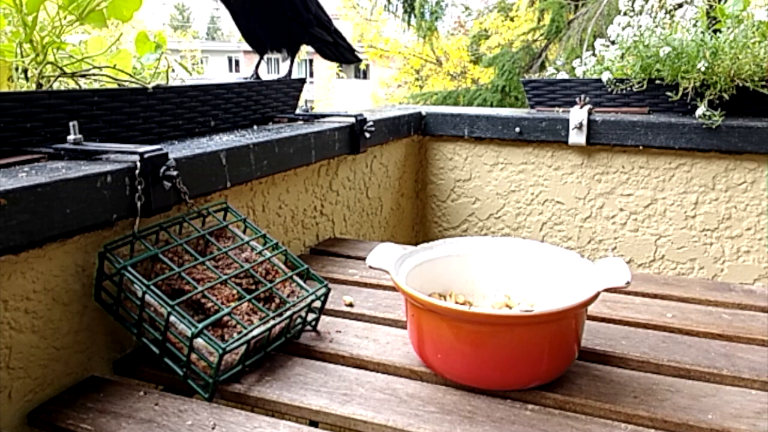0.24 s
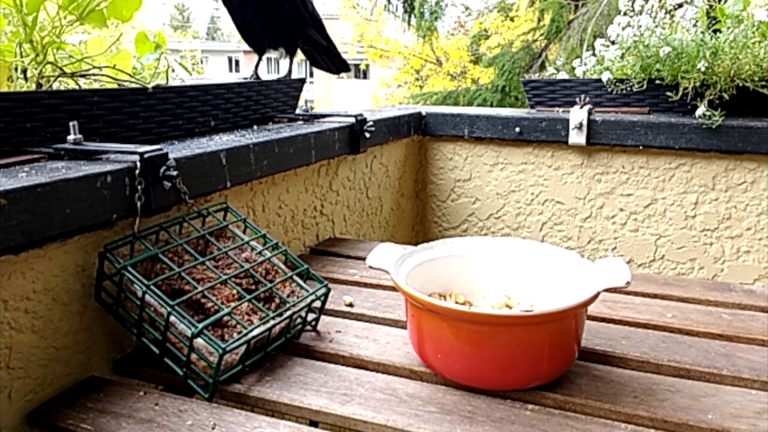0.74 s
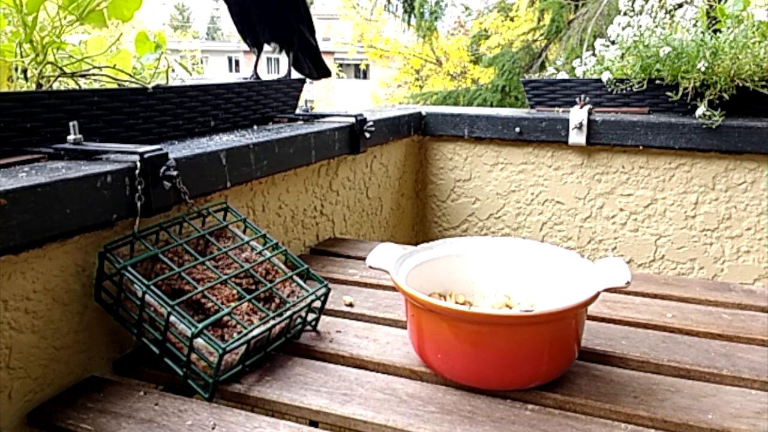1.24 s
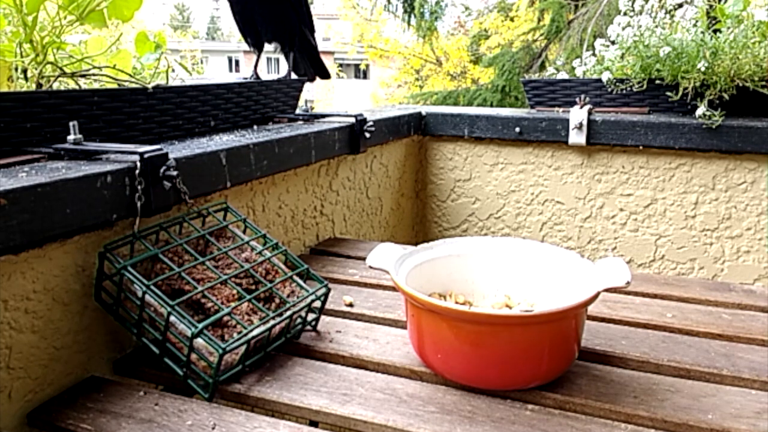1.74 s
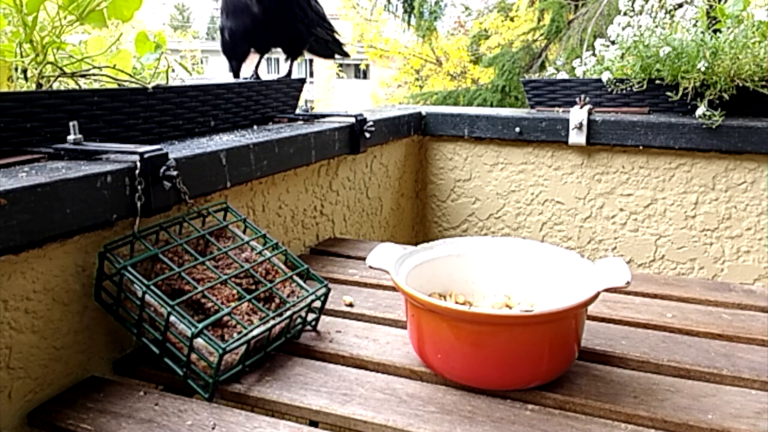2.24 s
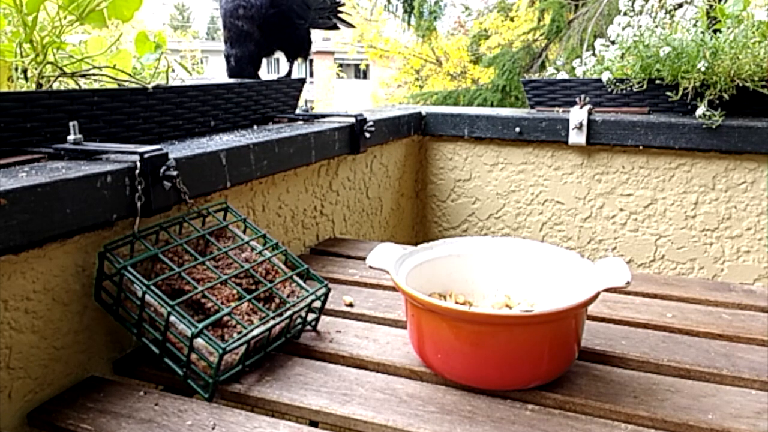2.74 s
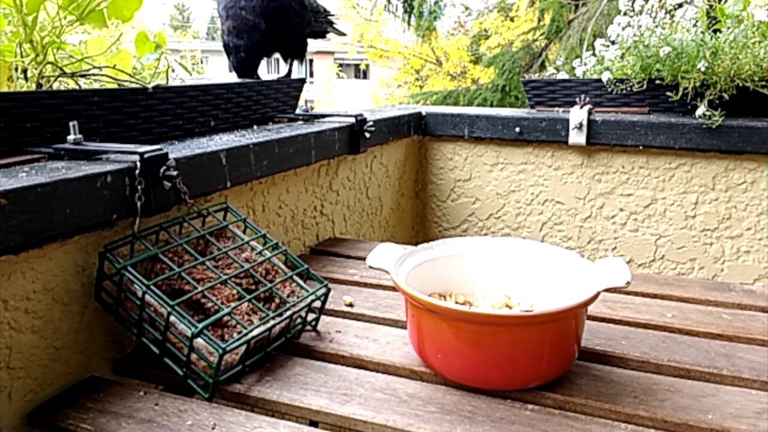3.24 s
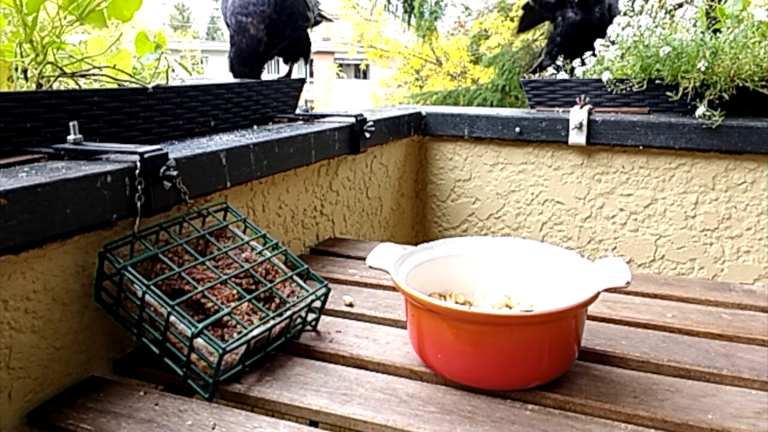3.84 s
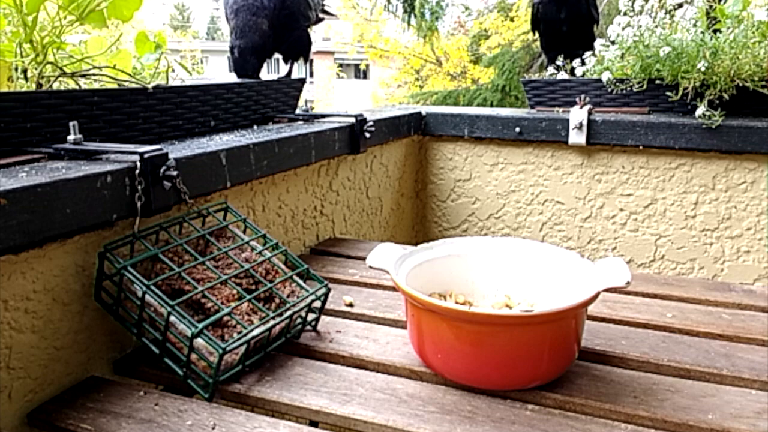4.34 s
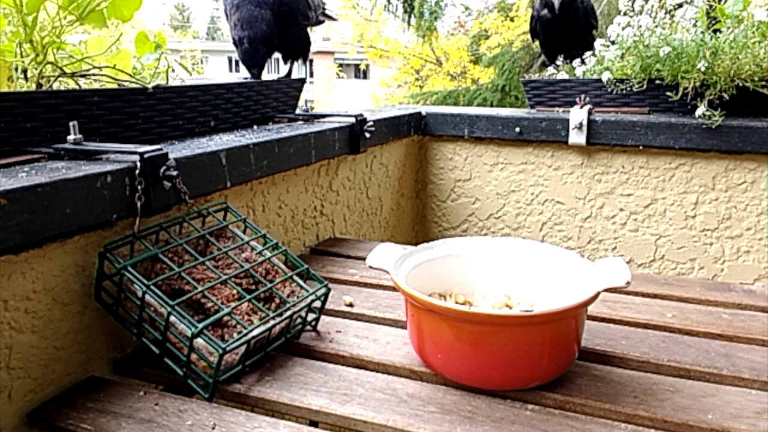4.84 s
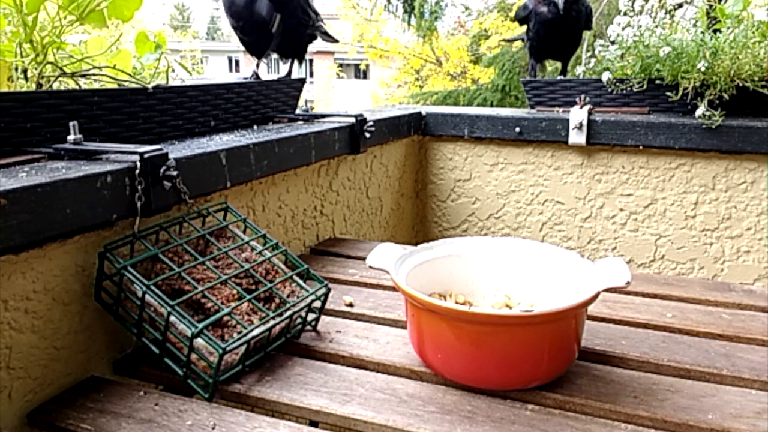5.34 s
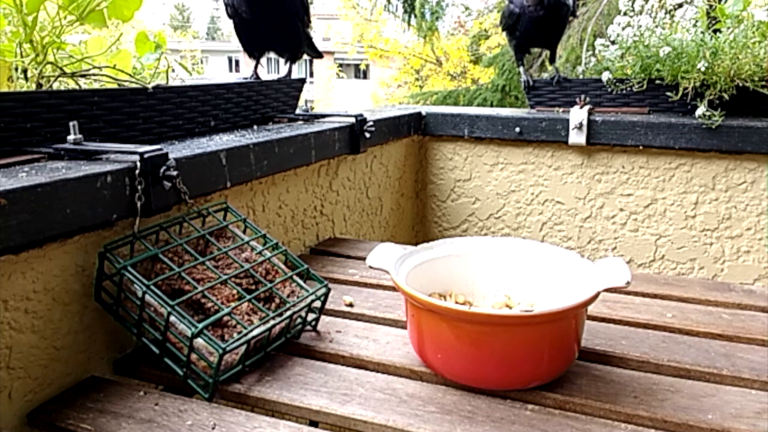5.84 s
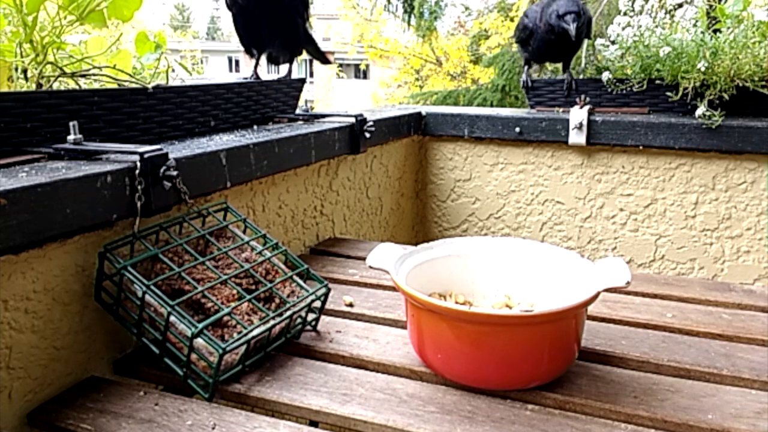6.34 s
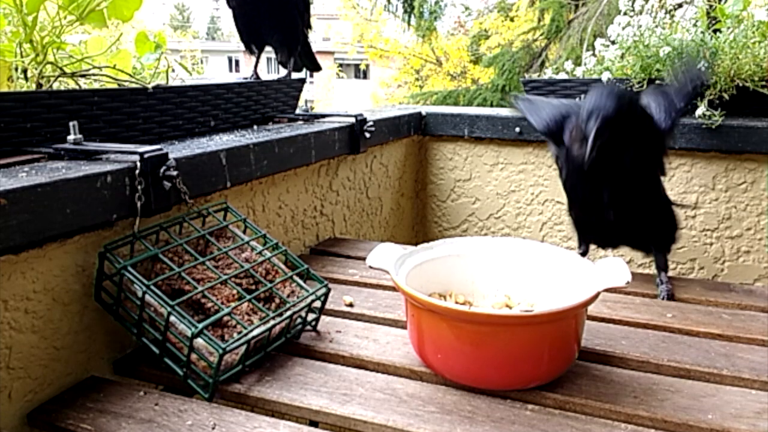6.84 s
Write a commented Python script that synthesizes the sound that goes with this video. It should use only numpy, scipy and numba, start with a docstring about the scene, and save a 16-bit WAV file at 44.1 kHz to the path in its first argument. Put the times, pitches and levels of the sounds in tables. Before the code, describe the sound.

On a small, quiet balcony, crows shift among flower boxes with faint claw ticks and feather rustles, and one lands with a soft, low thud. Three hoarse caws follow, close to the microphone and ringing briefly between the walls. Then a crow thumps onto a wooden table and clinks an enamelled pot. A low distant hum, a faint songbird and fine hiss lie behind.

```python
"""A small stucco balcony in a quiet neighbourhood, one small microphone close to two crows.
Claws tick and feathers rustle among the flower boxes; a box swings and rings under a landing bird.
Three hoarse caws, snapped out by the syrinx and shaped by throat and beak, ring between the walls.
Then a crow drops onto the slatted wooden table and clinks the enamelled pot.
Behind it all: a low, distant hum, a far songbird and a fine hiss."""
import sys
import numpy as np
from scipy import signal
from scipy.fft import rfft, irfft, next_fast_len
from scipy.io import wavfile
from scipy.ndimage import uniform_filter1d, map_coordinates
from numba import njit

SR = 44100
rng = np.random.default_rng(int(sys.argv[2]) if len(sys.argv) > 2 else 0)


def put_to_file(sound):
    """Save the sound as 16-bit audio at rate SR, in the file named by the first command-line argument."""
    columns = np.atleast_2d(sound).T  # one column per channel
    safe = np.clip(columns, -1, 1)
    whole_steps = np.round(safe * 32767)
    wavfile.write(sys.argv[1], SR, whole_steps.astype(np.int16))


N = 313551
TIME = np.arange(N) / SR


def undb(db):
    """Decibels to gain."""
    return 10 ** (np.asarray(db) / 20)


def unit(x):
    """Scale to rms 1."""
    return x / np.sqrt(np.mean(x ** 2) + 1e-20)


def steady(x, size=1500):
    """Hold the running rms at 1, keeping the fast grain."""
    return x / np.sqrt(uniform_filter1d(x ** 2, size) + 1e-12)


def colour(x, points):
    """Filter by a spectrum of (freq_hz, gain_db) points."""
    hz, db = np.transpose(points)
    size = next_fast_len(len(x))
    bins_hz = np.maximum(np.fft.rfftfreq(size, 1 / SR), 1)
    gain = undb(np.interp(np.log(bins_hz), np.log(hz), db))
    return irfft(rfft(x, size) * gain, size)[:len(x)]


@njit
def resonate(x, hz, width_hz):
    """A two-pole state-variable band-pass."""
    y, band_state, low_state = np.empty(len(x)), 0., 0.
    g, damping = np.tan(np.pi * hz / SR), width_hz / hz
    for i in range(len(x)):
        v = (band_state + g * (x[i] - low_state)) / (1 + g * (g + damping))
        band_state = 2 * v - band_state
        low_state += 2 * g * v
        y[i] = damping * v
    return y


def band(x, hz, width_hz):
    """A resonance applied twice, for steep sides."""
    return resonate(resonate(x, hz, width_hz), hz, width_hz)


def walk(rate_hz, size):
    """A smooth random wander with spread near 1."""
    steps = np.arange(size) * rate_hz / SR
    return map_coordinates(rng.standard_normal(int(steps[-1]) + 2), [steps], order=2, mode="nearest")


def fade(t, t60, rise_s):
    """A blow's envelope: quick rise, exponential decay."""
    return (1 - np.exp(-t / rise_s)) * np.exp(-np.log(1000) * t / t60)


def swells(rows):
    """Gain that rises and falls smoothly around each listed moment."""
    return sum(undb(db) * np.exp(-((TIME - peak_s) / half_s) ** 2) for peak_s, half_s, db in rows)


def ring(modes, t, rise_s):
    """Decaying modes of a struck body."""
    return sum(undb(db) * fade(t, t60, rise_s) * np.sin(2 * np.pi * hz * t) for hz, db, t60 in modes)


def add(out, start_s, x):
    """Mix x in at start_s."""
    i = int(start_s * SR)
    out[i:i + len(x)] += x[:max(N - i, 0)]


# The air beyond the balcony, far noise and hiss: freq_hz, gain_db
AIR_SPECTRUM = [(15, -38), (25, -14), (53, -0.5), (82, 0), (133, -7), (184, -8), (241, -7.5), (371, -15),
                (1010, -17.5), (1730, -23), (1870, -27), (3050, -25.5), (3880, -29.5), (9460, -30.5),
                (14600, -26), (15800, -19.5)]
# Low rumble in the background: freq_hz, gain_db
RUMBLE_SPECTRUM = [(25, -30), (45, -8), (72, -0.5), (95, -12), (130, -16), (300, -20.5), (900, -30),
                   (3000, -41.5)]
# Its swells: peak_s, half_length_s, level_db
RUMBLE_SWELLS = [(.12, 0.25, -50.5), (1.44, 0.28, -47)]
# A machine humming in the distance: pitch_hz, level_db
MACHINE_HUM = [(59.3, -56.5), (119, -58.5), (151, -64.5)]


def neighbourhood(air_db=-49.5, waver_db=1):
    """Steady far noise, a swelling rumble and a wavering machine hum."""
    air = unit(colour(rng.standard_normal(N), AIR_SPECTRUM)) * undb(air_db + waver_db * walk(5.5, N))
    rumble = unit(colour(rng.standard_normal(N), RUMBLE_SPECTRUM)) * swells(RUMBLE_SWELLS)
    hum = np.zeros(N)
    for hz, db in MACHINE_HUM:
        amplitude = np.sqrt(2) * undb(db + 2 * walk(3.785, N))
        hum += amplitude * np.sin(2 * np.pi * hz * TIME + 0.78 * walk(5.1, N))
    return air + rumble + hum


def crackle(level_db=-63, grain_db=4, swell_db=0.5):
    """The top of the hiss crackles finely."""
    grains = rng.standard_normal(N) * undb(grain_db * walk(110, N) + swell_db * walk(6.9, N))
    treble = [(1000, -48), (4000, -19), (10500, 14.5), (13000, 24), (15500, 10)]
    return undb(level_db) * unit(colour(grains, treble))


def patter(count=330, faintest_db=-61, range_db=5, t60=0.12, width_share=0.14):
    """Faint pips and ticks throughout, each at its own pitch."""
    out, t = np.zeros(N), TIME[:SR // 6]
    for when, pitch, strength in rng.random((count, 3)):
        hz = 1700 * 4.4 ** pitch
        pip = unit(band(rng.standard_normal(len(t)), hz, width_share * hz)) * fade(t, t60, 0.0031)
        add(out, when * N / SR, pip * undb(faintest_db + range_db * strength))
    return out


# Small ticks, close to the microphone and dry: start_s, level_db, centre_hz, width_hz
CLAW_TICKS = [(0.158, -47, 14300, 3000), (0.744, -48, 4600, 700), (0.928, -50, 10600, 2500),
              (0.965, -48, 5800, 1000), (1.078, -50.5, 6500, 4960), (1.464, -44.5, 7230, 1410),
              (1.759, -52, 8700, 2500), (2.03, -51.5, 7200, 2500), (2.222, -45.5, 13100, 3000),
              (2.344, -53, 8550, 11900), (2.77, -51.5, 2700, 1800), (2.841, -50, 13200, 7000),
              (4.064, -47.5, 9900, 1500), (4.457, -52.5, 2850, 900), (4.546, -52.5, 7350, 1300),
              (4.804, -49, 13600, 3970), (4.87, -43.5, 7000, 12800), (5.217, -40, 13000, 8060),
              (5.321, -44, 12800, 9110), (6.055, -48, 13000, 8950), (6.13, -52.5, 4570, 5970),
              (6.485, -36, 13530, 6000), (6.72, -44, 12410, 7050)]


def ticks(snap_db=-1, snap_t60=0.027, ring_db=-0.5, ring_t60=0.18):
    """Claws, beaks and the odd drip on wicker and leaves: a dry snap and a short ring."""
    out, t = np.zeros(N), TIME[:SR // 4]
    for start_s, db, hz, width_hz in CLAW_TICKS:
        noise = rng.standard_normal(len(t))
        snap = undb(snap_db) * unit(band(noise, 4800, 18000)) * fade(t, snap_t60, 0.00028)
        ringing = undb(ring_db) * unit(band(noise, hz, width_hz)) * fade(t, ring_t60, 0.0008)
        add(out, start_s, undb(db) * (snap + ringing))
    return out


# Feathers against leaves, close by: peak_s, half_length_s, level_db
FEATHER_BRUSHES = [(1.0, 0.19, -51), (1.6, 0.17, -52), (2.36, 0.019, -46), (3.29, 0.3, -50),
                   (3.5, 0.039, -47.5), (3.71, 0.064, -43)]


def rustle():
    """Feathers brush the leaves: a fine, grainy hiss."""
    grains = rng.standard_normal(N) * undb(2.8 * walk(150, N))
    spectrum = [(300, -23), (1500, -3.5), (6000, -6), (10000, -4), (13000, 1), (15500, 6)]
    return unit(colour(grains, spectrum)) * swells(FEATHER_BRUSHES)


# A small bird far off: start_s, length_s, start_hz, end_hz
SONG_NOTES = [(1.08, .07, 2310, 2125), (2.104, 0.049, 2090, 1700), (2.305, 0.065, 1880, 1570),
              (2.446, .09, 1580, 1726), (2.523, 0.052, 2500, 2700), (2.604, 0.087, 3810, 3830),
              (3.742, 0.041, 2340, 2330)]


def songbird(level_db=-60.5, waver=0.021):
    """Faint whistled notes that glide and waver."""
    out = np.zeros(N)
    for start_s, length_s, start_hz, end_hz in SONG_NOTES:
        size = int(length_s * SR)
        hz = np.linspace(start_hz, end_hz, size) * (1 + waver * walk(198, size))
        whistle = np.sqrt(2) * np.sin(2 * np.pi * np.cumsum(hz) / SR)
        add(out, start_s, undb(level_db) * whistle * signal.windows.tukey(size, .5))
    return out


# Echoes off the table, walls and ceiling around the microphone: delay_s, gain_db
BALCONY_ECHOES = [(.00212, -19), (.0069, -10), (0.0134, -2.5), (0.0213, -5.5)]


def balcony(x, near_db, far_db, near_t60=0.3, far_t60=1.2, direct_s=0.00054):
    """Close walls flutter and blur at once; houses across the yard add a dull, faint tail."""
    t = TIME[:SR]
    near = rng.standard_normal(SR) * undb(6.7 * rng.standard_normal(SR)) * fade(t, near_t60, 0.0049)
    far = band(rng.standard_normal(SR), 860, 4200) * fade(t, far_t60, 0.052)
    response = (undb(near_db) * unit(near) + undb(far_db) * unit(far)) / np.sqrt(SR)
    for delay_s, db in [(direct_s, 0)] + BALCONY_ECHOES:
        response[int(delay_s * SR)] += undb(db)
    return signal.oaconvolve(x, response / np.sqrt(np.sum(response ** 2)))[:N]


# Feet scuffing a perch: freq_hz, gain_db
SCUFF_SPECTRUM = [(100, -14), (290, -7.5), (450, -5.5), (700, -13.5), (1100, -10), (1500, -9), (2450, -17),
                  (3000, -16.5), (3600, -24), (15500, -29)]
# Modes of the flower box: pitch_hz, gain_db, t60_s
BOX_MODES = [(107.5, 8.5, 0.28), (180, 4.5, 0.37), (338, 11, 0.088), (449, 1.5, 0.15), (596, 5.5, 0.088),
             (686, 4.5, 0.15)]
# Modes of the slatted table: pitch_hz, gain_db, t60_s
TABLE_MODES = [(89.3, -21, 0.11), (143, 3.5, 0.45), (194.5, -6, 0.38), (248, -14, 0.076), (321, -6.5, 0.4),
               (440, 4.5, 0.22), (512, -12, 0.53), (624, -15, 0.41), (1491, 2, 0.14)]
# Crows landing near the microphone: start_s, scuff_db, swing_db, swing_hz, swing_t60_s, body_db, perch
CROW_LANDINGS = [(3.671, -42.5, -28.5, 62.3, 0.46, -46.5, "box"), (5.935, -46, -45, 110, .15, -52.5, "box"),
                 (6.924, -21.5, -10, 116.4, 0.17, -24, "table")]


def landings(scuff_t60=0.22, weight_lag_s=0.0091):
    """Claws scuff first, then the bird's weight sets the perch swinging and ringing."""
    scuffs, thuds, t = np.zeros(N), np.zeros(N), TIME[:SR // 2]
    perches = {"box": ring(BOX_MODES, t, rise_s=0.0015), "table": ring(TABLE_MODES, t, rise_s=0.033)}
    for start_s, scuff_db, swing_db, swing_hz, swing_t60, body_db, perch in CROW_LANDINGS:
        grains = rng.standard_normal(len(t)) * undb(2 * walk(319, len(t)))
        scuff = unit(colour(grains, SCUFF_SPECTRUM)) * fade(t, scuff_t60, 0.00051)
        swing = ring([(swing_hz, swing_db, swing_t60)], t, rise_s=0.026)
        add(scuffs, start_s, undb(scuff_db) * scuff)
        add(thuds, start_s + weight_lag_s, swing)
        add(thuds, start_s, undb(body_db) * perches[perch])
    return scuffs, thuds


# A crow calling from the balcony, close: start_s, length_s, level_db, top_pitch_hz, dull_start_db
CROW_CALLS = [(4.925, 0.36, -26.5, 496.4, 3), (5.48, .43, -25.5, 525.4, 11), (6.337, .425, -25, 518.5, 15)]


def caws(attack_s=0.046, attack_db=11.5, sag_db_per_s=15, release_s=0.093, release_db=13.5,
         bright_db=-3, brighten_s=0.028, dulling_db_per_s=9.5):
    """Each caw swells, then sags and dulls as the air runs out; its upper resonances come in late."""
    out = np.zeros(N)
    for start_s, length_s, level_db, top_hz, dull_start_db in CROW_CALLS:
        age = np.arange(int(length_s * SR)) / SR
        low, high = throat(syrinx(age, length_s, top_hz))
        high_db = bright_db - dulling_db_per_s * age - dull_start_db * np.exp(-age / brighten_s)
        voice = steady(low) + steady(high) * undb(high_db)
        attack = attack_db * np.maximum(1 - age / attack_s, 0)
        release = release_db * np.maximum(1 - (length_s - age) / release_s, 0)
        effort_db = level_db - attack - sag_db_per_s * age - release
        add(out, start_s, voice * undb(effort_db) * signal.windows.tukey(len(age), .015))
    return out


SCOOP_S = 0.026  # pitch and resonances rise together at the start of a caw


def syrinx(age, length_s, top_hz, scoop_share=0.26, hold_s=0.11, sag_octaves_per_s=2.3,
           rough_start_rad=0.23, rough_end_rad=0.59, flutter_hz=300, shimmer_db=3, rasp=0.48):
    """The syrinx snaps ever more unevenly as its pitch scoops up, holds, then sinks."""
    size = len(age)
    scoop = 1 - scoop_share * np.exp(-age / SCOOP_S)
    sag = 2 ** (-sag_octaves_per_s * np.maximum(age - hold_s, 0))
    # each snap comes a little early or late: low harmonics stay clean, high ones smear
    roughness = rough_start_rad + (rough_end_rad - rough_start_rad) * age / length_s
    phase = 2 * np.pi * np.cumsum(top_hz * scoop * sag) / SR + roughness * walk(flutter_hz, size)
    snaps = unit(sum(np.cos(k * phase) for k in range(1, 37)))
    # air hisses through once a cycle
    breath = unit(band(rng.standard_normal(size), 2640, 7900) * (1 + np.cos(phase)) ** 2)
    return (snaps + rasp * breath) * undb(shimmer_db * walk(238.5, size))


# Resonances of the crow's throat and beak: beak_narrow_hz, beak_wide_hz, width_hz, gain_db
THROAT_RESONANCES = [(1494, 1393, 235, 0.5), (2000, 1855, 540, -9), (3150, 3570, 570, 1.5),
                     (3450, 4350, 730, -3), (6730, 6940, 990, -8), (7100, 9300, 1040, -21),
                     (10200, 10000, 680, -24), (12700, 11800, 1300, -28)]
# The bare voice that passes between them: freq_hz, gain_db
BARE_VOICE = [(200, -50), (360, -17.5), (500, -19.5), (750, -19), (1000, -9.5), (1200, -15), (2700, -18.5),
              (5400, -28.5), (8500, -30.5), (13000, -41), (16000, -50)]


def throat(source, flat_start_hz=230, beak_opens_s=0.15, beak_move_s=0.046):
    """The opening beak spreads the resonances apart; gives the voice's low part and its high part."""
    hz, age, frames = signal.stft(source, SR, nperseg=512, noverlap=384)
    opening = .5 + .5 * np.tanh((age - beak_opens_s) / (2 * beak_move_s))
    flat_hz = flat_start_hz * np.exp(-age / SCOOP_S)
    peaks = []
    for narrow_hz, wide_hz, width_hz, db in THROAT_RESONANCES:
        centre_hz = narrow_hz + (wide_hz - narrow_hz) * opening - flat_hz
        peaks.append(undb(db) ** 2 * .5 ** ((2 * (hz[:, None] - centre_hz) / width_hz) ** 2))
    bare_hz, bare_db = np.transpose(BARE_VOICE)
    bare = undb(np.interp(np.log(hz + 1), np.log(bare_hz), bare_db))[:, None] ** 2
    powers = sum(peaks[:2]) + bare, sum(peaks[2:]) + 1e-4
    # minimum phase: each resonance rings on after the snap that strikes it
    gains = [np.exp(np.conj(signal.hilbert(.5 * np.log(power), axis=0))) for power in powers]
    return [signal.istft(frames * g, SR, nperseg=512, noverlap=384)[1][:len(source)] for g in gains]


# Modes of the enamelled pot: pitch_hz, gain_db, t60_s
POT_MODES = [(1280, -11, 0.17), (1640, -13, 0.088), (1827, -2, 0.081), (2312, 2.5, .09), (2430, -17, 0.077),
             (5160, -7, 0.12), (5900, -13, 0.086)]
# Claw blows on the pot, close by: start_s, level_db
POT_BLOWS = [(7.068, -30), (7.076, -27)]


def clinks():
    """A last step strikes the pot and sets it ringing."""
    out = np.zeros(N)
    for start_s, db in POT_BLOWS:
        add(out, start_s, undb(db) * ring(POT_MODES, TIME[:SR // 2], rise_s=0.00012))
    return out


def scrape(start_s=7.073, level_db=-38.5, centre_hz=6500, width_hz=14000, t60=0.68):
    """Claws slide on the rim of the pot."""
    out, t = np.zeros(N), TIME[:SR // 4]
    friction = unit(band(rng.standard_normal(len(t)), centre_hz, width_hz))
    add(out, start_s, undb(level_db) * friction * fade(t, t60, 0.001))
    return out


def scene():
    """From one spot on the balcony, in mono: crows close, songbird and neighbourhood far behind."""
    calls = balcony(caws(), near_db=1.5, far_db=-23)
    song = balcony(songbird(), near_db=1, far_db=-21)
    scuffs, thuds = landings()
    feet = thuds + balcony(scuffs + clinks(), near_db=-2, far_db=-32.5) + scrape()
    return (calls + song + feet + ticks() + patter() + rustle() + crackle() + neighbourhood())[None]


def record(dry, bass_hz=40, top_hz=15750):
    """The small microphone loses the deep bass; the recorder cuts the top."""
    thin = signal.sosfilt(signal.butter(6, bass_hz, "high", fs=SR, output="sos"), dry)
    return signal.sosfilt(signal.ellip(12, .1, 80, top_hz, fs=SR, output="sos"), thin)


dry = scene()
out = record(dry)
put_to_file(out)
```